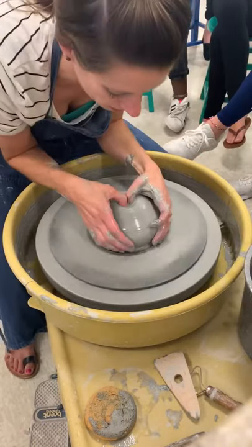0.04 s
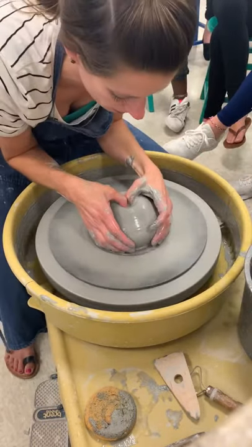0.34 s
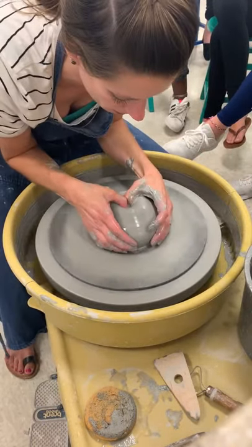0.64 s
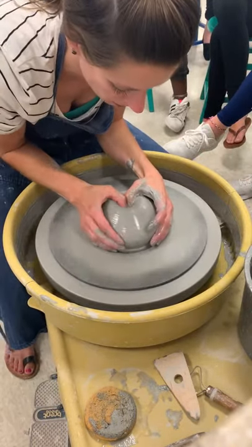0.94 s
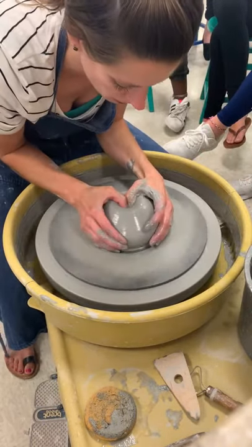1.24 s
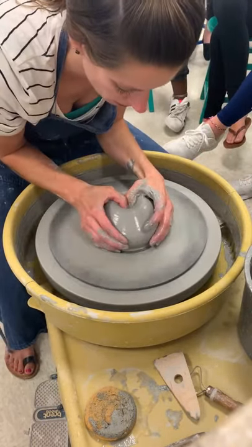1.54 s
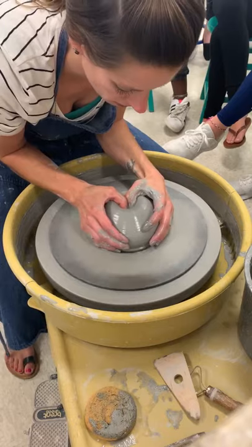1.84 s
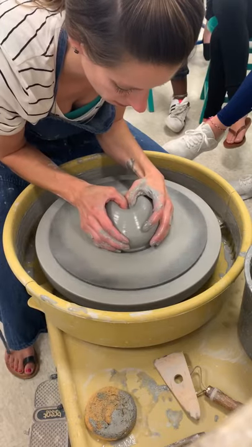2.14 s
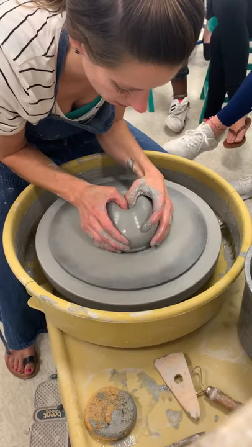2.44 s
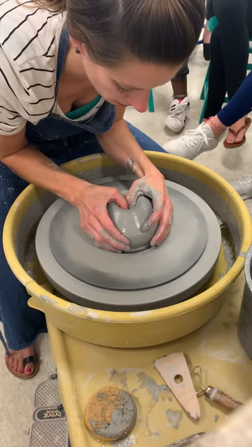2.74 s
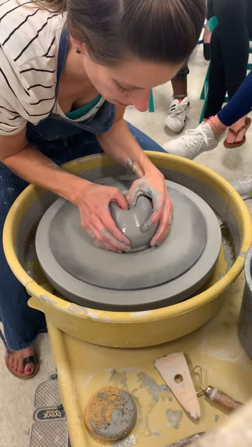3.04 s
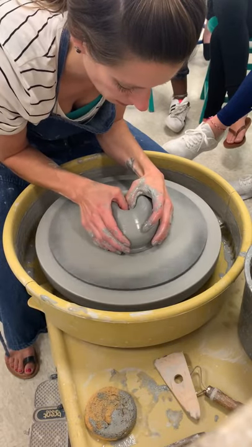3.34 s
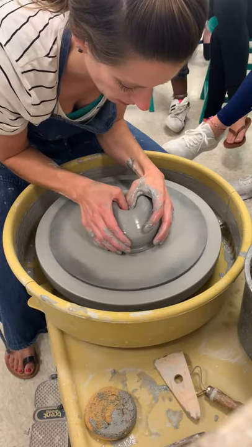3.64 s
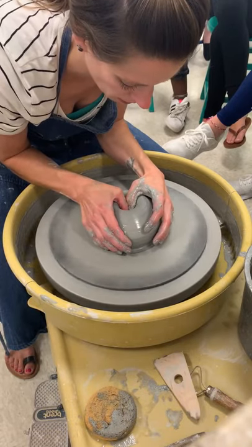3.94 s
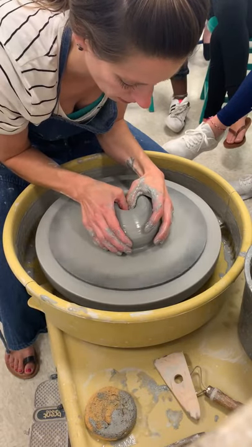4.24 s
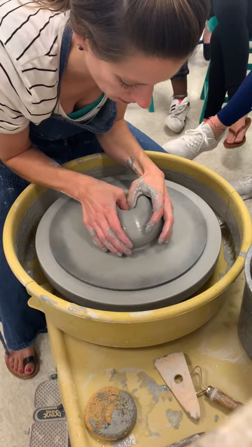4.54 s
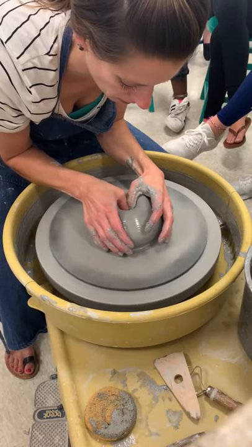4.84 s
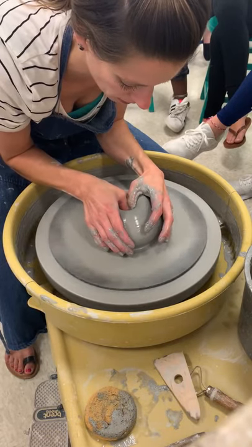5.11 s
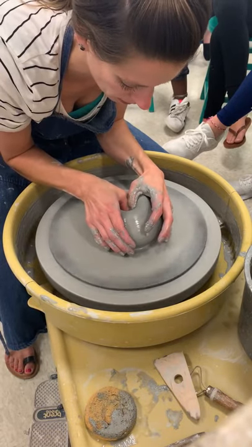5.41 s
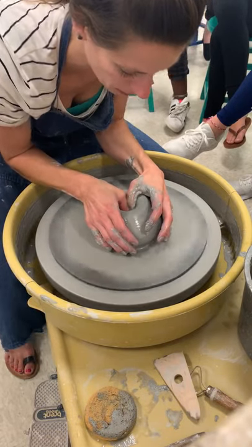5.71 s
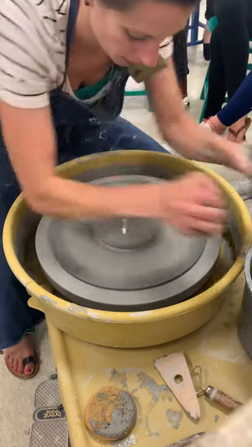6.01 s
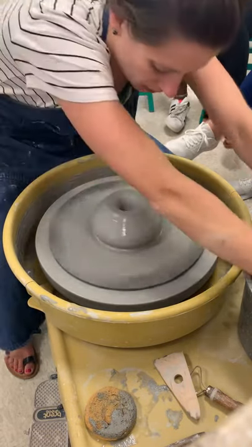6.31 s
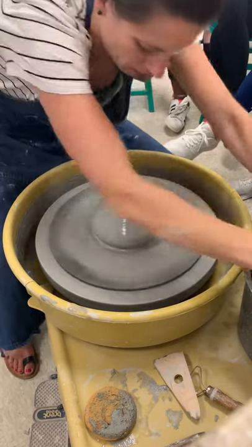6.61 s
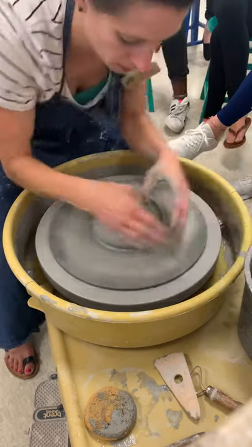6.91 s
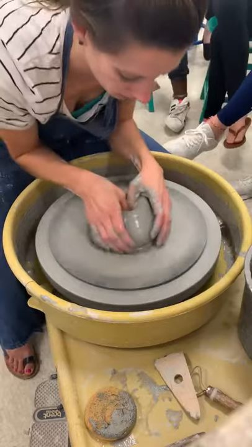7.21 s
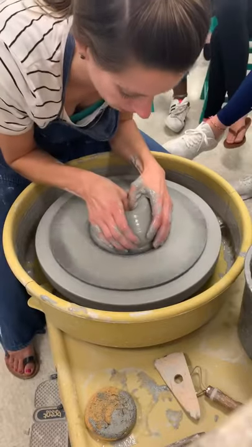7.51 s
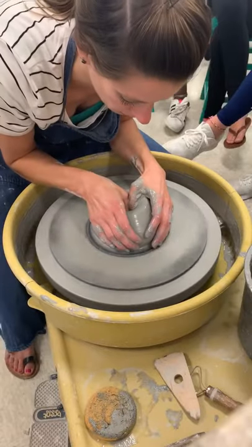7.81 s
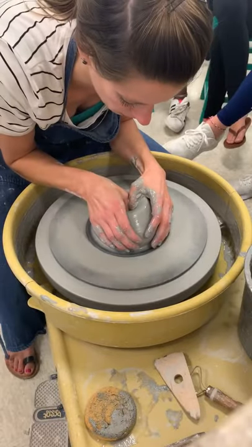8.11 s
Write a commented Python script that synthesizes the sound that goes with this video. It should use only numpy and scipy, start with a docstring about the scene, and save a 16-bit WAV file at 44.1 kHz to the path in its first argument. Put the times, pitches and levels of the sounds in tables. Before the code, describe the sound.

Wet clay swishes rhythmically on a humming, softly thumping pottery wheel, and hands briefly stir water in a bucket before returning.

```python
"""The hum, whine and sizzle of an electric potter's wheel fill a studio: the motor sounds multiples
of its shaft speed and its brushes scrape. Once a turn the wheel head thumps softly and wet clay
swishes under the hands; the wheel knocks once under load. Late on, the hands stir up bubbles in a
water bucket and return to the clay. A phone with two ports listens."""
import sys
import numpy as np
from scipy import signal
from scipy.fft import rfft, irfft, next_fast_len
from scipy.io import wavfile
from scipy.ndimage import map_coordinates

SR = 44100
rng = np.random.default_rng(int(sys.argv[2]) if len(sys.argv) > 2 else 0)


def generate_wav(signal):
    """Clip the signal to [-1, 1] and save it as 16-bit WAV at the path in sys.argv[1]."""
    frames = np.transpose(np.atleast_2d(signal))
    scaled = np.clip(frames, -1, 1) * 32767
    pcm = np.round(scaled).astype(np.int16)
    wavfile.write(sys.argv[1], SR, pcm)


N = 364089
T = np.arange(N) / SR
WHEEL_TURN_S, HOUSING_HZ = .3128, 126


# hand load on the motor: t/s, gain/dB
LOAD_DB = [(0, 2.5), (.9, -2), (1.6, 0), (2.4, -0.5), (2.8, 7.5), (3.05, 9), (3.45, 8), (3.7, -0.5),
           (4.1, 1.5), (4.6, -3), (5.6, -1), (6.8, -5), (7.3, -2), (8.26, -3.5)]
# brief surges of the hum: t/s, gain/dB
HUM_SURGES = [(.22, 2.5), (1.12, 9.5), (3.5, 5), (3.95, 8), (4.12, 4.5), (4.25, 4), (4.6, 6), (4.76, 5),
              (5.09, 7), (5.5, 4), (6.32, 9), (7.33, 7), (8.2, 9)]
# hum's octave: t/s, level/dB
HUM_OCTAVE_DB = [(0, -64), (4.1, -62.5), (4.6, -58), (5.0, -59), (5.4, -64.5), (8.26, -62)]

def motor_hum(shaft):
    """Third shaft order and housing boom grow with load; off-centre clay drags on them once a turn."""
    surge_db = sum(db * np.exp(-((T - s) / .065) ** 2) for s, db in HUM_SURGES)
    drag_db = np.cos(2 * np.pi * (T - .09) / WHEEL_TURN_S)
    boom = amp(-56) * resonance(HOUSING_HZ, width_hz=6.8)
    third = tone(3 * shaft, -52.5 + surge_db)
    mains = tone(120 * T, -66.5)  # twice the mains frequency
    octave = tone(6 * shaft, curve(HUM_OCTAVE_DB) + 2.6 * wobble(8))
    return amp(curve(LOAD_DB) + drag_db) * (third + boom) + mains + octave


def frame_drone():
    """The frame drones near the tenth shaft order, swelling slowly and growing with load."""
    drone_hz, swell_period_s = 398.2, 2.03
    swell = np.abs(1 + amp(-3) * np.exp(2j * np.pi * (T - .71) / swell_period_s))
    return swell * tone(drone_hz * T + .04 * wobble(11), -52.5 + .15 * curve(LOAD_DB))


# whine partials: shaft order, level/dB
WHINE_ORDERS = [(10, -61), (11, -63), (12, -65.5), (16, -61.5), (23, -75.5), (25, -73.5), (28, -77.5),
                (29, -63.5), (35, -76), (38, -71), (54, -81), (61, -78.5), (64, -79.5), (71, -77),
                (77, -75), (80, -75)]
# armature slot tones: t/s, level/dB
SLOT_48_DB = [(0, -58), (.75, -57), (1.02, -63), (1.15, -59.5), (1.37, -60.5), (1.55, -59), (3.05, -56.5),
              (3.5, -60), (3.75, -63), (4.08, -58.5), (4.3, -58.5), (4.48, -63), (4.65, -59.5), (5.55, -60),
              (5.87, -66), (6.02, -59.5), (6.15, -62), (6.6, -67), (6.92, -67), (7.1, -60.5), (7.6, -57.5),
              (8.26, -59)]
SLOT_32_DB = [(0, -66), (3.0, -68.5), (3.7, -77), (7, -92), (7.4, -64), (8.26, -84)]

def motor_whine(shaft):
    """Shaft orders and the armature's slot tones follow the speed and flutter in level."""
    whine = sum(tone(order * shaft, db + 1.44 * wobble(2.057) + 1.3 * wobble(15))
                for order, db in WHINE_ORDERS)
    slots = tone(48 * shaft, curve(SLOT_48_DB)) + tone(32 * shaft, curve(SLOT_32_DB))
    return whine + amp(1.3 * wobble(20)) * slots


# scrape spectra of the two brushes: f/Hz, gain/dB
LOW_SCRAPE_DB = [(8500, -120), (10000, -93), (10600, -88), (10920, -86.5), (11200, -74.5), (11600, -83.5),
                 (11750, -84.5), (12350, -78), (13450, -116)]
HIGH_SCRAPE_DB = [(13500, -120), (14500, -102), (15050, -94), (15230, -88), (15420, -83), (15540, -101),
                  (16000, -110)]
# holder resonances: f/Hz, width/Hz, level/dB
LOW_MODES = [(5680, 32, -79), (6320, 16, -76), (6820, 26, -74), (8140, 38, -77), (11600, 22, -64),
             (11910, 21, -67.5), (12170, 14, -68)]
HIGH_MODES = [(14790, 45, -76), (15670, 32, -73)]
# squeal tones: shaft order, level/dB
LOW_SQUEALS = [(277, -61.5), (280, -57), (283, -58.5), (287, -58)]
HIGH_SQUEALS = [(377, -67)]
# catches on the commutator: position/turns, width/turns, gain/dB
LOW_CATCHES = [(0.66, 0.18, 6), (0.38, 0.096, 6), (0.049, 0.14, 5.5)]
HIGH_CATCHES = [(.035, .05, 7.5), (.225, .05, 6), (.125, .06, 3), (.37, .07, 4.5)]

def brush(shaft, spectrum, modes, squeals, catches, fresh_share):
    """A brush scrapes, rings its holder and squeals, catching at the same spots every shaft turn."""
    turn, shaft_hz = shaft % 1, 40.41
    track = signal.resample(white(round(SR / shaft_hz)), SR // 4)
    repeated = np.interp(turn, np.linspace(0, 1, len(track)), track)
    friction = np.sqrt(1 - fresh_share) * repeated + np.sqrt(fresh_share) * white()
    scrape = amp(-3.5) * colour(friction, spectrum)
    scrape += sum(amp(db) * resonance(hz, width_hz) for hz, width_hz, db in modes)
    jitter_cycles = .22 * wobble(45)
    for order, db in squeals:
        cycles = order * (shaft - catches[0][0]) + jitter_cycles + .031 * wobble(25)
        scrape += np.sqrt(2) * amp(db + wobble(11)) * np.cos(2 * np.pi * cycles)
    grip_db = sum(db * np.exp(-.5 * (((turn - at + .5) % 1 - .5) / width) ** 2)
                  for at, width, db in catches)
    return unit(scrape * amp(grip_db + .9 * wobble(10))) * np.std(scrape)


# harder thumps: t/s, level/dB
HARD_THUMPS = [(0.049, -28), (.362, -28), (1.302, -29), (1.615, -27.5), (2.555, -28), (3.489, -27.5),
               (3.8, -29.5), (4.744, -27.5), (5.065, -27), (5.681, -28), (6.305, -27), (7.556, -27.5),
               (8.181, -26.5)]

def wheel_thumps():
    """The wheel head thumps softly once a turn and sets the housing ringing."""
    out = np.zeros(N)
    for s, db in each_turn(HARD_THUMPS, at_s=.05, scatter_s=.00294, usual_db=-30, scatter_db=.64):
        add(out, s, ring(150 + 5 * rng.normal(), db, t60_s=.09, attack_s=.009))
        add(out, s, ring(HOUSING_HZ, db - 6, t60_s=.2, attack_s=.03))
    return out


# modes of the knock: t/s, f/Hz, level/dB, t60/s
KNOCK_MODES = [(3.080, 1200, -31, .016), (3.0804, 860, -25.5, 0.032), (3.0825, 780, -28.5, 0.036),
               (3.084, 415, -24, 0.06), (3.0851, 290, -24.5, 0.019), (3.084, 180, -26.5, 0.034)]

def wheel_knock():
    """The loaded wheel gives one dull knock."""
    out = np.zeros(N)
    for s, hz, db, t60_s in KNOCK_MODES:
        add(out, s, ring(hz, db, t60_s, attack_s=.0011))
    return signal.sosfilt(signal.butter(4, 1400, fs=SR, output='sos'), out)


# running wheel and room: f/Hz, density/(dB per Hz)
RUMBLE_DB = [(12, -87), (25, -66), (42, -71), (64, -67), (95, -74.5), (165, -74), (210, -75.5), (275, -77),
             (300, -73.5), (345, -74.5), (370, -70), (420, -80.5), (495, -77.5), (545, -85.5), (690, -87.5),
             (900, -100), (3000, -125)]

def bearing_rumble():
    """The bearing rumbles, slightly more as the hands bear down."""
    return colour(white(), RUMBLE_DB) * amp(.041 * curve(LOAD_DB) + wobble(7))


# passes where the clay grabs: t/s, relative level/dB
CLAY_GRABS = [(0.138, -62.5), (.785, -63), (1.09, -64.5), (1.425, -66), (1.72, -61.5), (2.03, -64.5),
              (2.34, -62.5), (2.648, -62), (3.268, -63), (3.585, -65.5), (3.9, -66), (4.22, -61),
              (4.535, -66), (4.858, -63.5), (5.14, -61.5), (5.452, -66), (5.778, -64), (6.08, -63.5),
              (7.02, -64.5), (7.36, -66), (7.655, -63), (7.96, -64.5)]
# small wet patches: t/s within the turn, half length/s, level/dB
WET_PATCHES = [(0.063, 0.016, -68), (0.227, 0.0098, -69)]
# spectrum of shearing slip: f/Hz, gain/dB
SLIP_DB = [(500, -42), (1000, -10), (2000, -0.5), (2700, 2), (3600, 10.5), (5000, 3.5), (6900, 8.5),
           (7750, 4), (8300, 2.5), (16000, -13)]
# thin hiss between passes: t/s, level/dB
FILM_DB = [(0, -66.5), (1.7, -67.5), (2.2, -65), (3.5, -68), (4.0, -70.5), (5.3, -73), (6.3, -67.5),
           (6.9, -69), (7.1, -65), (7.45, -69), (8.26, -75)]

def clay():
    """Slip shears under the palms: once a turn the wet side squelches and trails off in gritty hiss."""
    hands_off_s, hands_on_s, rise_s, fall_s = 6.2, 6.95, .015, .045
    passes, squelch = np.zeros(N), np.zeros(N)
    for s, db in each_turn(CLAY_GRABS, at_s=.14, scatter_s=.005, usual_db=-66, scatter_db=1):
        if hands_off_s < s < hands_on_s:
            continue
        envelope = np.where(T < s, np.exp(-((T - s) / rise_s) ** 2), np.exp(-np.abs(T - s) / fall_s))
        passes += amp(db + 9) * envelope
        for when, pitch, loud in rng.random((14, 3)):  # tiny air pockets burst
            hz = 3300 * 2.3 ** pitch
            add(squelch, s + .08 * when ** 2, ring(hz, db + 10 * loud, t60_s=55 / hz))
    patches = sum(amp(db) * np.exp(-((T % WHEEL_TURN_S - s) / half_s) ** 2)
                  for s, half_s, db in WET_PATCHES)
    patches *= amp(2.7 * wobble(4.4))
    hiss = unit(colour(white(), SLIP_DB))
    hiss += .26 * unit(colour(crackle(rate_hz=560, spread_db=3), SLIP_DB))
    stick_slip = unit(amp(3 * wobble(200) + 1.7 * wobble(22)))
    return squelch + (passes + patches + amp(curve(FILM_DB))) * stick_slip * unit(hiss)


# large air pockets: t/s, f/Hz, level/dB
LARGE_BUBBLES = [(6.382, 2330, -38.5), (6.463, 726, -39.5), (6.4636, 2190, -40), (6.47, 3280, -36.5),
                 (6.486, 3100, -46), (6.497, 660, -41), (6.528, 1200, -36.5), (6.554, 1900, -43),
                 (6.624, 894, -40.5), (6.624, 3400, -34.5), (6.627, 1170, -35), (6.658, 1080, -43),
                 (6.759, 3000, -40.5), (6.769, 1390, -47)]
# strength of stirring: t/s, gain/dB
STIR_DB = [(6.25, -76), (6.39, -62), (6.458, -63), (6.468, -53), (6.55, -55.5), (6.6, -58), (6.63, -53.5),
           (6.68, -54), (6.72, -57), (6.78, -55), (6.9, -72)]

def water():
    """Hands stir the bucket: large bubbles ring and split over a swarm of small ones and fine spray."""
    pops, swarm = np.zeros(N), np.zeros(N)
    for s, hz, db in LARGE_BUBBLES:
        add(pops, s, ring(hz, db, t60_s=60 / hz, glide=.11, attack_s=.00052))
        for when, pitch in rng.random((4, 2)):
            split_hz = hz * (.85 + .6 * pitch)
            add(pops, s + .035 * when, ring(split_hz, db - 9.5, t60_s=30 / split_hz, glide=.11))
    start_s, end_s = STIR_DB[0][0], STIR_DB[-1][0]
    for when, pitch, loud in rng.random((260, 3)):
        hz = 650 * 6 ** pitch  # smaller bubbles: higher, fainter, shorter
        bubble = ring(hz, 9 * loud - 5 * pitch - 6, t60_s=40 / hz, glide=.15)
        add(swarm, start_s + when * (end_s - start_s), bubble)
    drops = white() + 90 * crackle(rate_hz=760, spread_db=1)
    spray = unit(colour(drops, [(300, -29), (800, 3.5), (3600, -3), (6500, -3), (12000, -15)]))
    return pops + amp(curve(STIR_DB)) * (1.15 * swarm + .6 * spray)


# finger smacks: t/s, level/dB, f/Hz, width/octaves, t60/s
WET_SMACKS = [(.297, -44, 9900, .06, .035), (1.728, -55, 3880, .1, 0.06), (5.779, -50, 1090, 0.37, .05),
              (6.305, -52, 7070, .4, .03), (6.3796, -31, 12000, 1.9, 0.022), (6.464, -40, 1900, .6, 0.026),
              (6.528, -46.5, 1700, 0.55, 0.08), (6.5528, -39, 2500, 0.55, 0.036),
              (6.623, -47, 1900, 0.74, 0.048), (6.648, -53, 1400, 0.7, 0.09), (6.70, -50, 5860, .2, .06),
              (6.755, -49, 5800, 0.55, 0.046), (6.96, -39, 8500, 0.8, 0.02)]

def smacks():
    """Wet skin parts from clay or water: a short burst of noise round one pitch."""
    out, t = np.zeros(N), T[:SR // 8]
    hz = np.fft.rfftfreq(len(t), 1 / SR) + 1
    lead = SR // 100  # room for the burst to swell
    for s, db, centre_hz, octaves, t60_s in WET_SMACKS:
        band = unit(np.exp(-.5 * (np.log2(hz / centre_hz) / octaves) ** 2))
        burst = np.roll(amp(db - 60 * t / t60_s) * rng.standard_normal(len(t)), lead)
        add(out, s - lead / SR, irfft(rfft(burst) * band, len(t)))
    return out


# midrange rushing: t/s, level/dB
RUSH_DB = [(0, -66), (.6, -66), (.9, -61.5), (1.3, -72), (2.3, -82), (4.5, -75), (5.0, -68), (5.6, -72),
           (5.8, -61), (6.2, -63.5), (7.0, -68), (7.35, -62), (7.8, -62), (8.26, -66)]
# steady hiss: f/Hz, density/(dB per Hz)
AIR_DB = [(300, -110), (800, -104.5), (1050, -94.5), (1200, -93), (1450, -99), (2100, -96.5),
          (2500, -101.5), (2720, -107), (2950, -97.5), (4600, -100), (5700, -102.5), (7700, -108),
          (9000, -101), (12000, -88.5), (16000, -110)]

def background():
    """A soft rushing comes and goes over a faint, steady hiss."""
    spectrum = [(450, -8), (780, .5), (950, 8.5), (1300, 3.5), (2500, -8), (5000, -36)]
    rushing = unit(colour(white(), spectrum)) * amp(curve(RUSH_DB) + 1.8 * wobble(21))
    return rushing + colour(white(), AIR_DB)


# diffuse sound in the room: f/Hz, share
DIFFUSE_SHARE = [(40, 0.00029), (130, 0.0015), (280, 0.05), (700, 0.12), (1200, 0.5), (2200, 0.11),
                 (3500, 0.3), (4500, 0.00024), (6000, 0.00073), (9000, 0.00016), (15000, 0.0081)]

def studio(tones, noises, t60_s):
    """Reflections scramble the phase of noises, only turn that of tones, and reach the sides opposed."""
    t, size = T[:SR // 2], next_fast_len(N + SR // 2)
    tail = rng.standard_normal(len(t)) * amp(-60 * t / t60_s) * (t > .004)
    tail_phase = np.exp(1j * np.angle(rfft(tail, size)))
    scattered = irfft(rfft(noises, size) * tail_phase, size)[:N]
    turned = .79 * filtered(tones, lambda hz: 1j)
    side_share = lambda hz: along(DIFFUSE_SHARE, hz) / 2
    direct = filtered(tones + noises, lambda hz: np.sqrt(1 - side_share(hz)))
    room = filtered(scattered + turned, lambda hz: np.sqrt(side_share(hz)))
    return np.array([direct + room, direct - room])


def amp(db):
    return 10 ** (np.asarray(db) / 20)


def unit(x):
    return x / np.sqrt(np.mean(x ** 2) + 1e-20)


def along(points, hz):
    """(f/Hz, value) points read on a log axis."""
    f, values = np.transpose(points)
    return np.interp(np.log(hz + 1), np.log(f + 1), values)


def curve(points):
    """(t/s, value) points read at every sample."""
    return np.interp(T, *np.transpose(points))


def wobble(rate_hz):
    """A smooth random curve with rate_hz knots a second."""
    return map_coordinates(rng.standard_normal(int(N * rate_hz / SR) + 4), [T * rate_hz])


def filtered(x, response):
    """x through a complex frequency response."""
    size = next_fast_len(N + SR // 2)
    return irfft(rfft(x, size) * response(np.fft.rfftfreq(size, 1 / SR)), size)[..., :N]


def colour(x, spectrum):
    """x shaped by (f/Hz, gain/dB) points."""
    return filtered(x, lambda hz: amp(along(spectrum, hz)))


def white(size=N):
    """Noise of 0 dB per Hz."""
    return rng.standard_normal(size) * np.sqrt(SR / 2)


def resonance(centre_hz, width_hz):
    """Narrow-band noise, rms 1."""
    return unit(filtered(white(), lambda hz: np.exp(-.5 * ((hz - centre_hz) / width_hz) ** 2)))


def crackle(rate_hz, spread_db):
    """Uneven clicks at random moments, rms 1."""
    clicks = (rng.random(N) < rate_hz / SR) * rng.standard_normal(N)
    return unit(clicks * amp(spread_db * np.minimum(rng.exponential(size=N), 3)))


def tone(cycles, rms_db):
    return np.sqrt(2) * amp(rms_db) * np.sin(2 * np.pi * (cycles + rng.random()))


def ring(hz, db, t60_s, glide=0, attack_s=.00038):
    """A damped mode whose pitch may glide upward."""
    t = T[:SR // 3]
    cycles = hz * (t + glide * t * t / t60_s)
    return amp(db - 60 * t / t60_s) * (1 - np.exp(-t / attack_s)) * np.sin(2 * np.pi * cycles)


def add(track, s, sound):
    part = track[round(s * SR):][:len(sound)]
    part += sound[:len(part)]


def each_turn(marked, at_s, scatter_s, usual_db, scatter_db):
    """(t/s, level/dB) once a wheel turn; marked turns keep their own values."""
    turns = np.arange(at_s, T[-1], WHEEL_TURN_S)
    rows = list(marked)
    for s, (late, loud) in zip(turns, rng.standard_normal((len(turns), 2))):
        if all(abs(s - marked_s) > WHEEL_TURN_S / 2 for marked_s, _ in marked):
            rows.append((s + scatter_s * late, usual_db + scatter_db * loud))
    return rows


# shaft speed, drifting slightly: t/s, f/Hz
SHAFT_SPEED_HZ = [(0, 40.41), (1.3, 40.42), (2.9, 40.36), (3.45, 40.51), (3.9, 40.43), (5.4, 40.425),
                  (5.9, 40.52), (6.4, 40.43), (8.26, 40.405)]

def scene():
    """One shaft drives hum, whine and brushes; wheel, clay and water join them in the studio."""
    shaft = np.cumsum(curve(SHAFT_SPEED_HZ)) / SR - .02 + .00088 * wobble(15)  # turns
    brushes = brush(shaft, LOW_SCRAPE_DB, LOW_MODES, LOW_SQUEALS, LOW_CATCHES, fresh_share=.91)
    brushes += brush(shaft, HIGH_SCRAPE_DB, HIGH_MODES, HIGH_SQUEALS, HIGH_CATCHES, fresh_share=.98)
    tones = motor_whine(shaft) + motor_hum(shaft) + frame_drone()
    wheel = wheel_thumps() + wheel_knock() + bearing_rumble()
    noises = brushes + wheel + clay() + water() + smacks() + background()
    return studio(tones, noises, t60_s=.11)


# left port over right: f/Hz, gain/dB
PORT_BALANCE_DB = [(80, 0), (380, -.8), (2000, -.6), (3500, 0)]
# left port's lead: f/Hz, phase/rad
PORT_LEAD_RAD = [(20, 0), (1400, .1), (2800, .9), (4000, 1.6), (4550, 3), (5100, 3.3), (5500, 4.5),
                 (7000, 6.28), (8050, 7.6), (8700, 9.3), (9400, 9.55), (10000, 11), (11100, 12.5),
                 (11650, 12.9), (12200, 14.1), (13000, 15.6), (13650, 15.8), (14100, 18.4), (15300, 18.85)]

def record(dry):
    """Two band-limited ports hear the treble out of step and the midrange slightly to the right."""
    sides, top_hz = np.array([[.5], [-.5]]), 15780
    gain = lambda hz: amp(sides * along(PORT_BALANCE_DB, hz)) * (hz < top_hz)
    phase = lambda hz: np.exp(1j * sides * along(PORT_LEAD_RAD, hz))
    return filtered(dry, lambda hz: gain(hz) * phase(hz))


dry = scene()
out = record(dry)
generate_wav(out)
```